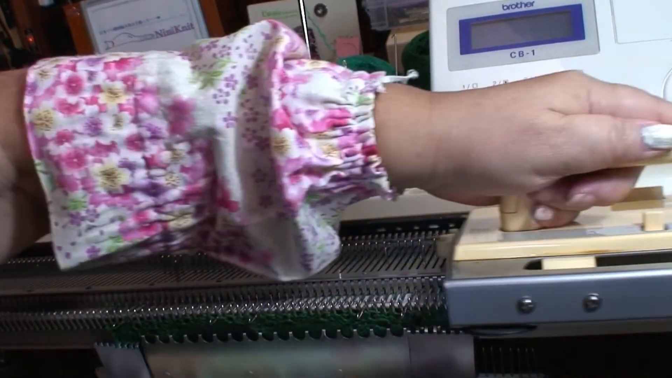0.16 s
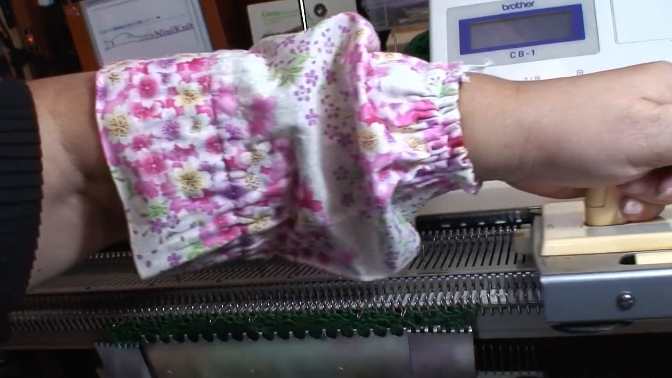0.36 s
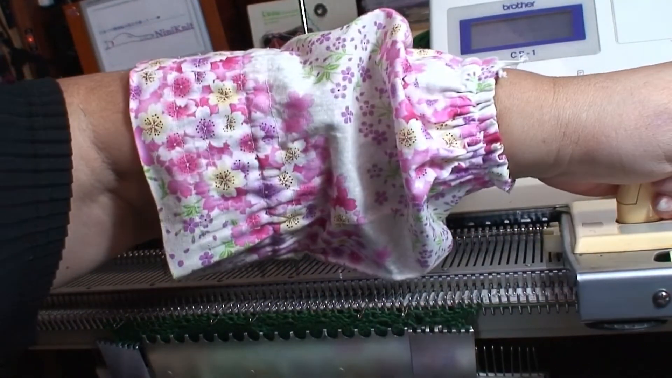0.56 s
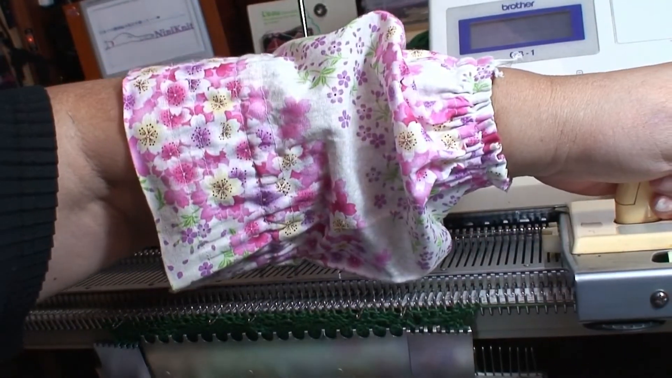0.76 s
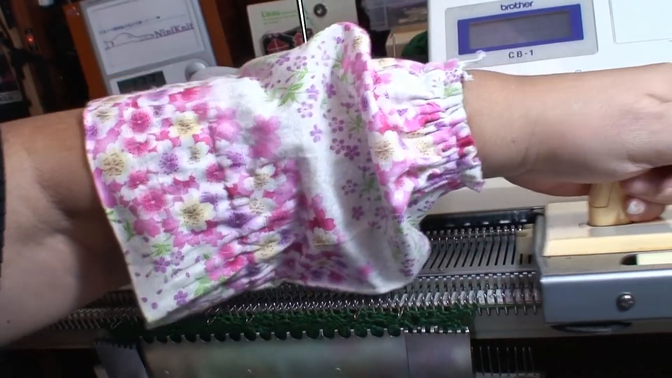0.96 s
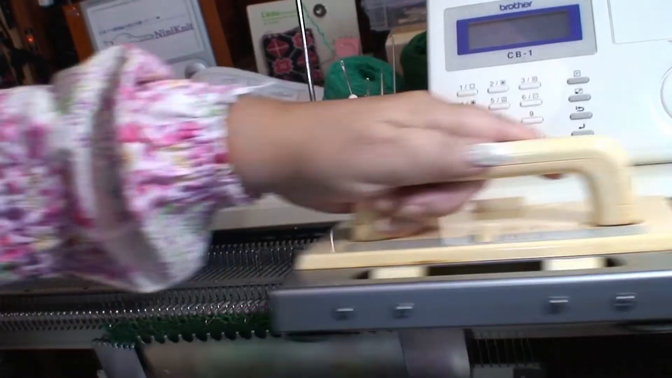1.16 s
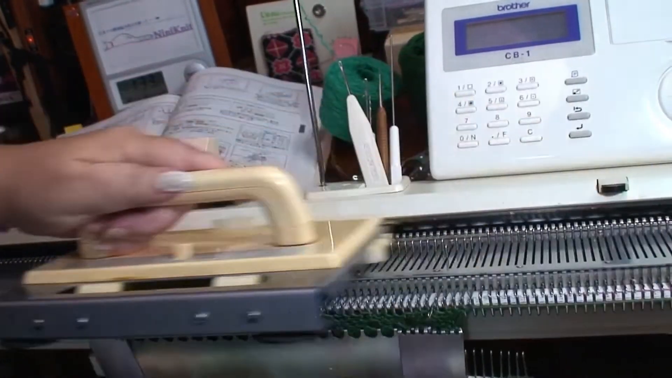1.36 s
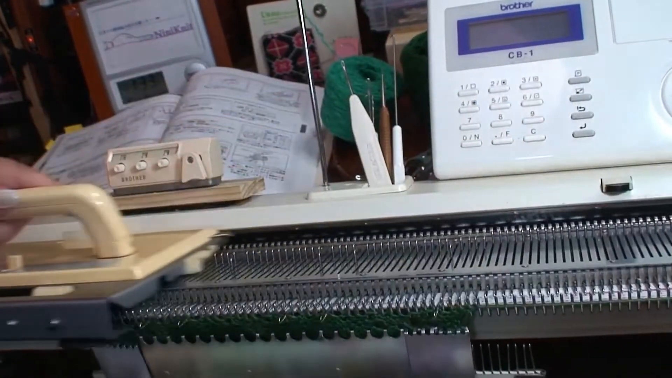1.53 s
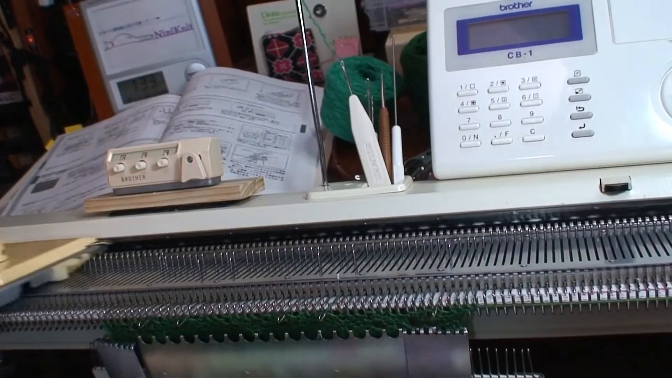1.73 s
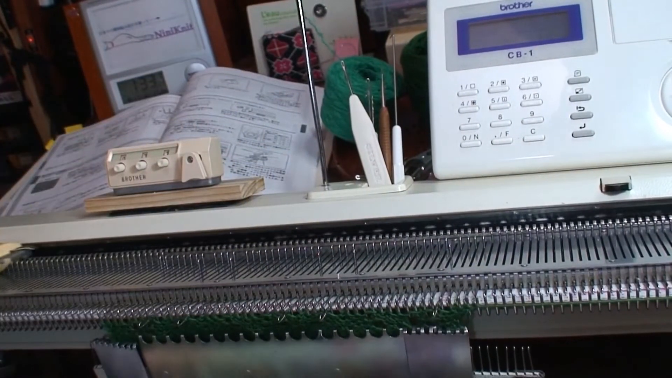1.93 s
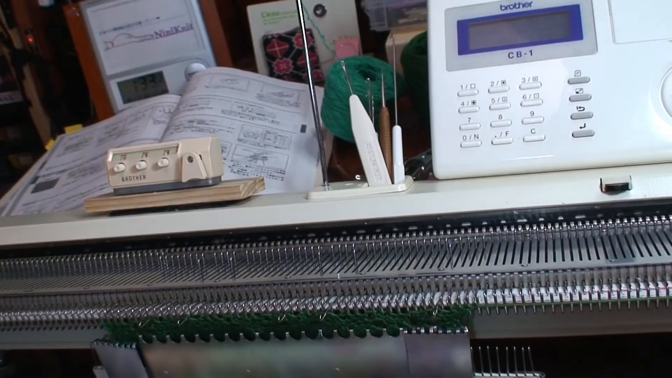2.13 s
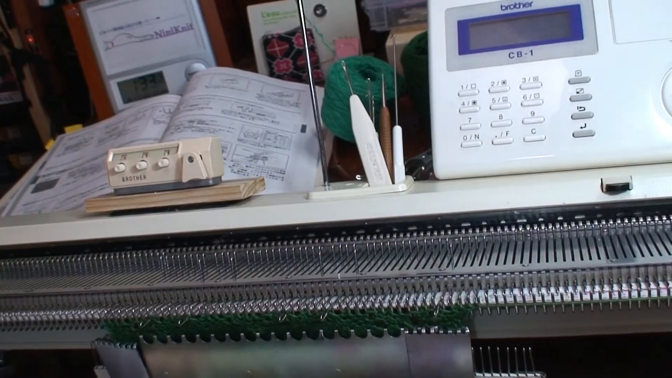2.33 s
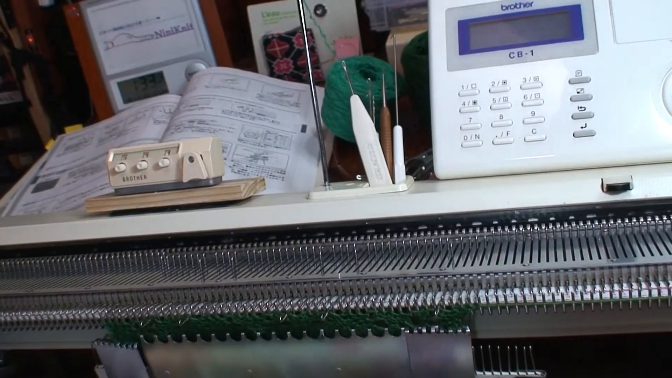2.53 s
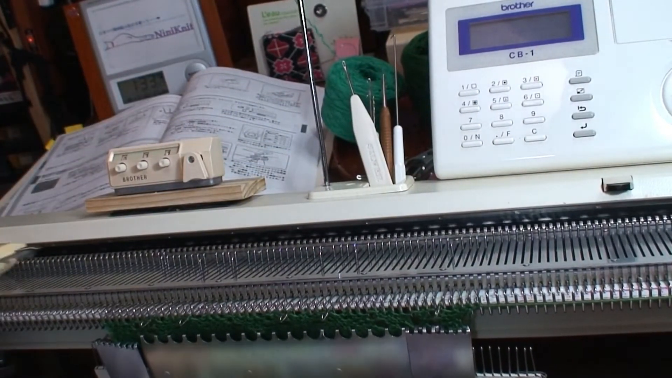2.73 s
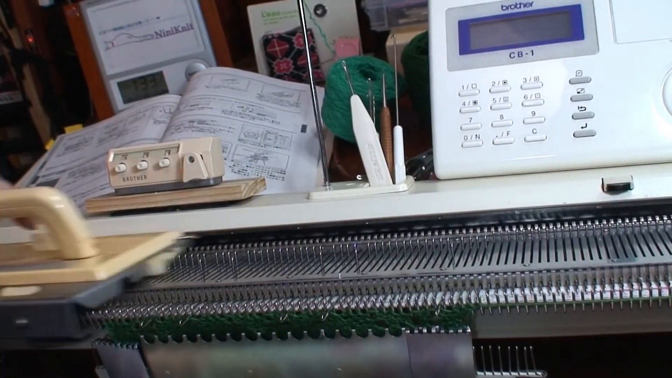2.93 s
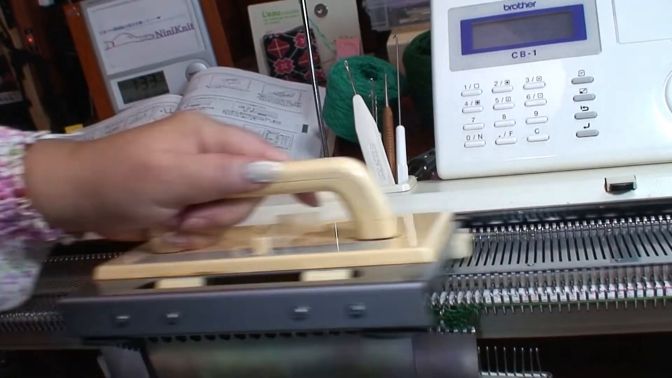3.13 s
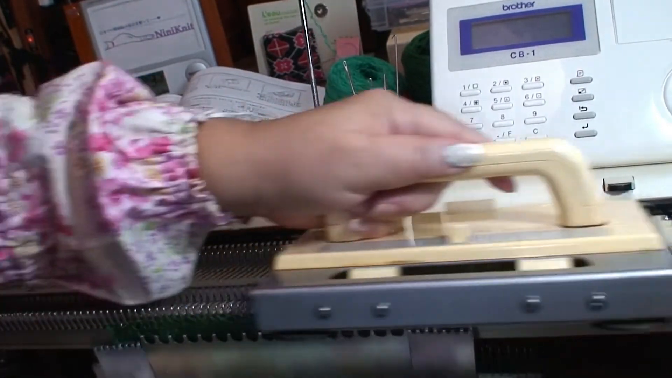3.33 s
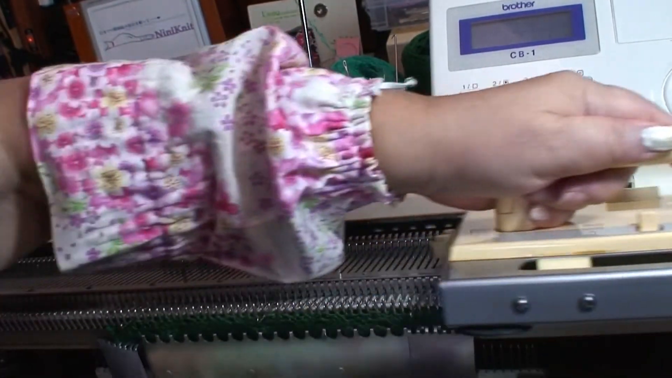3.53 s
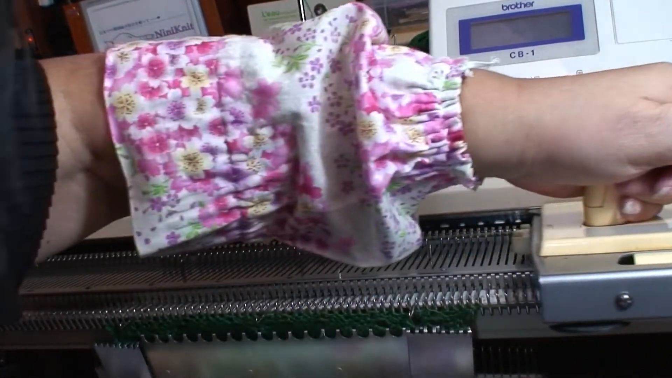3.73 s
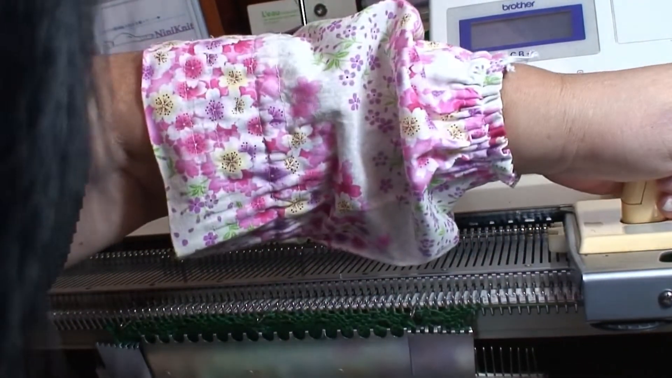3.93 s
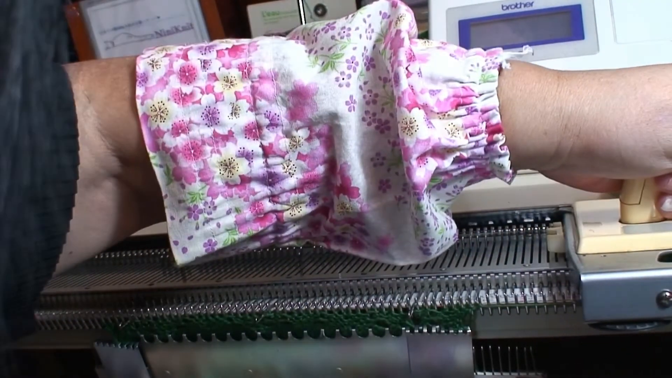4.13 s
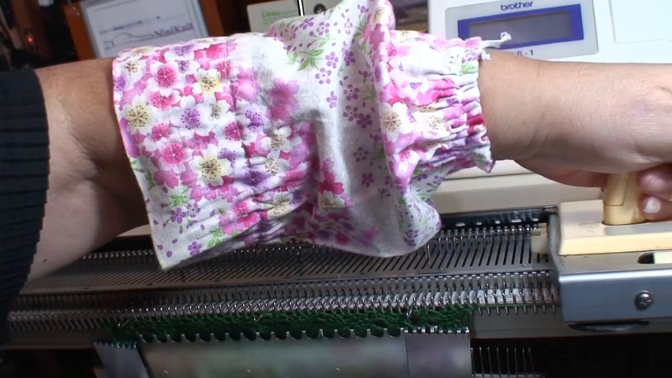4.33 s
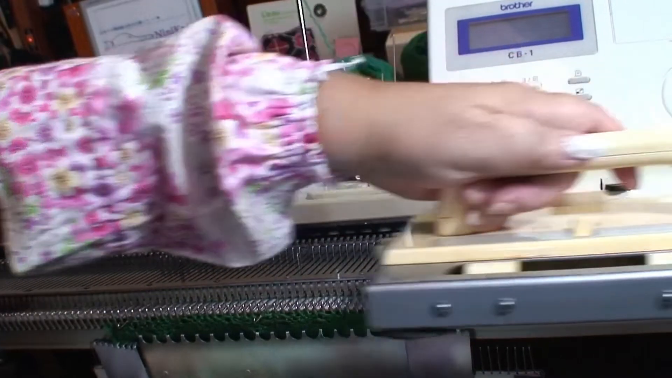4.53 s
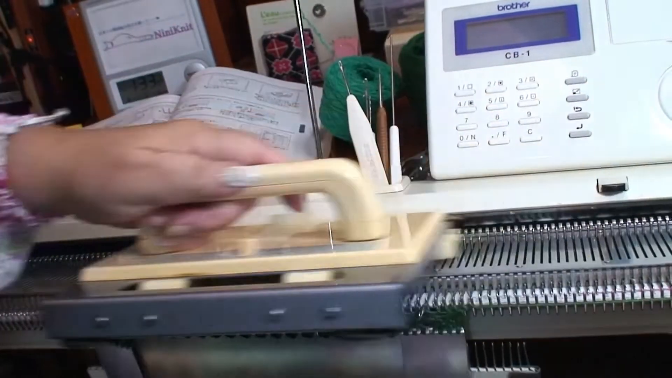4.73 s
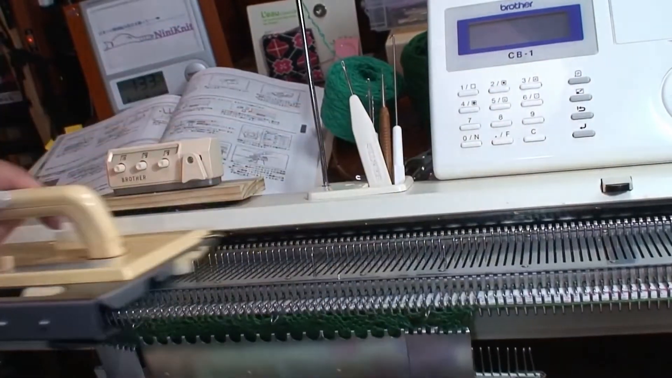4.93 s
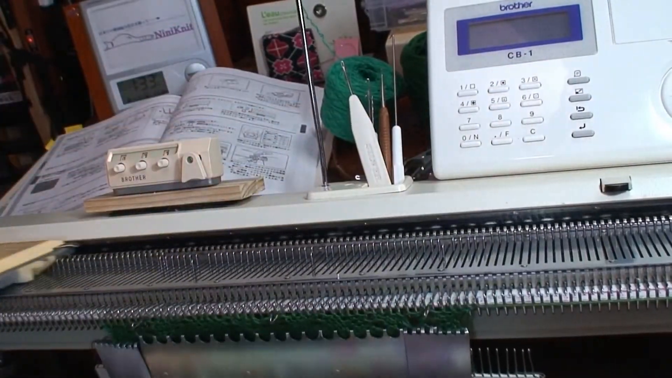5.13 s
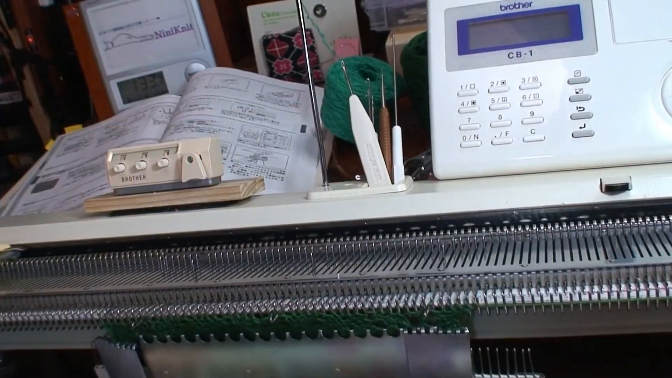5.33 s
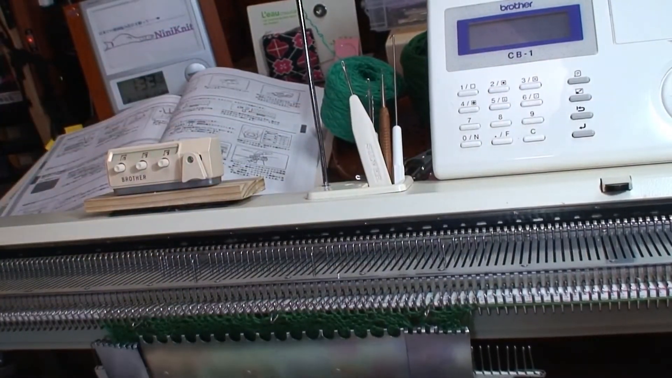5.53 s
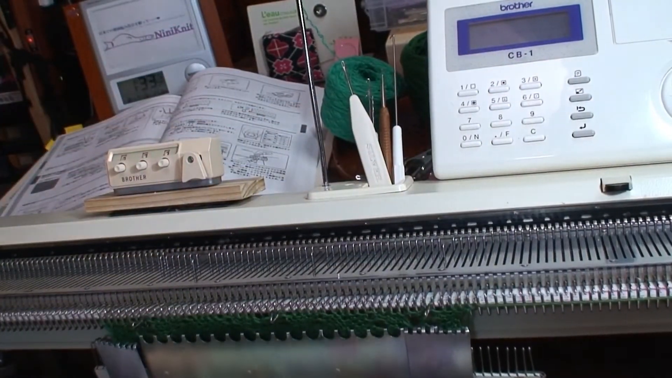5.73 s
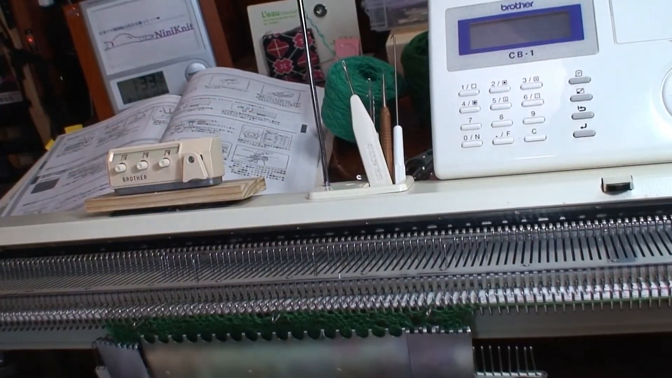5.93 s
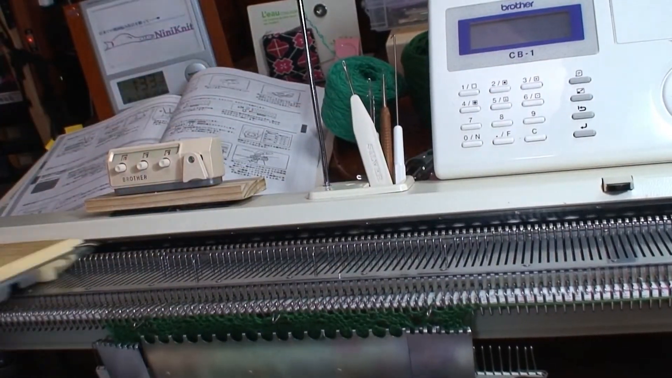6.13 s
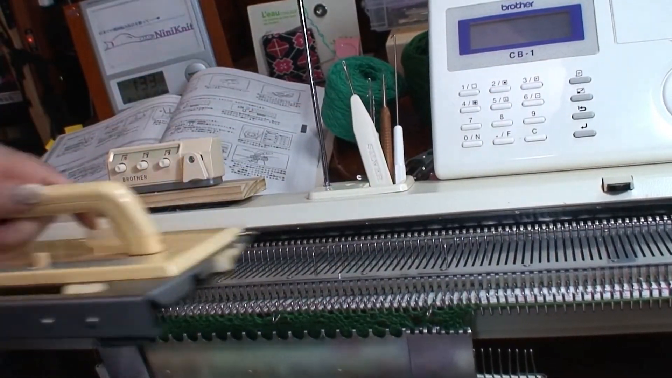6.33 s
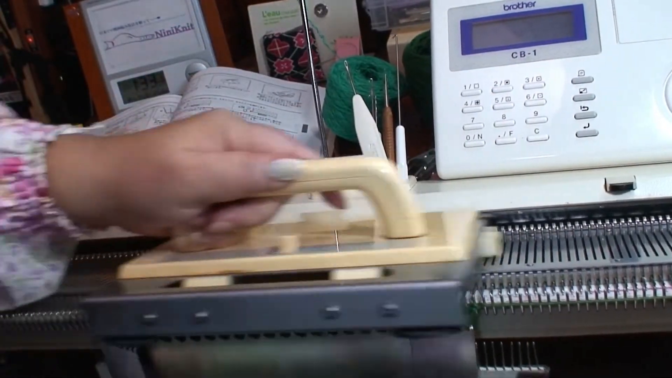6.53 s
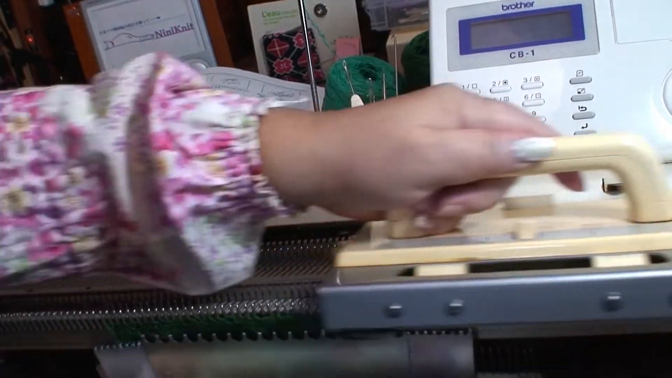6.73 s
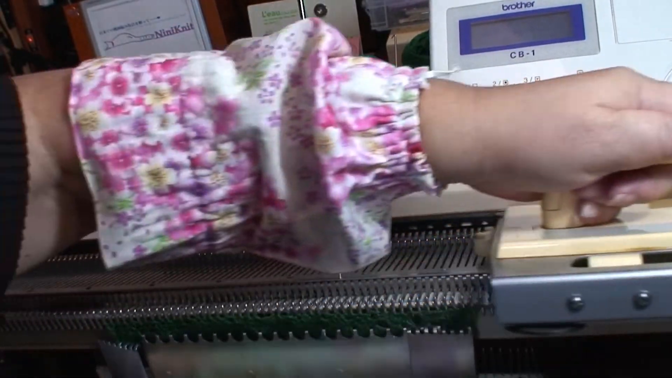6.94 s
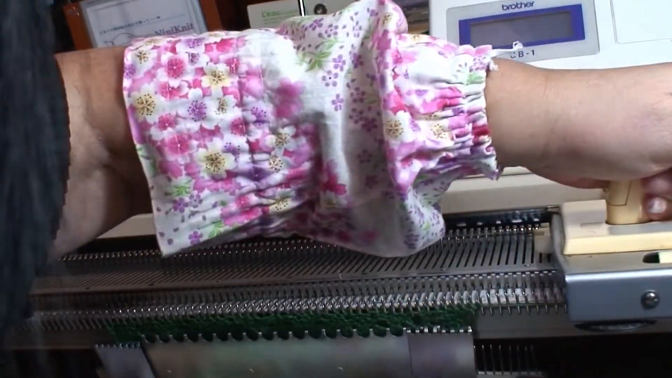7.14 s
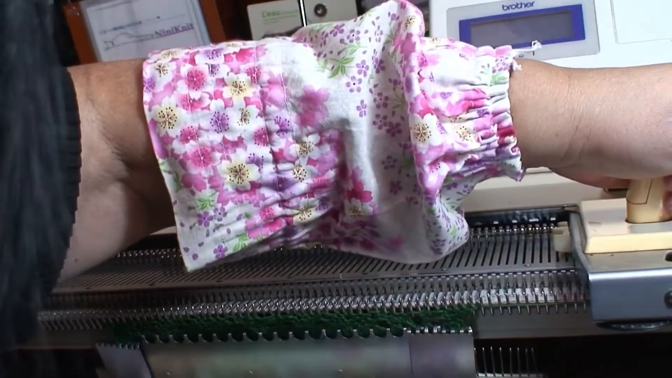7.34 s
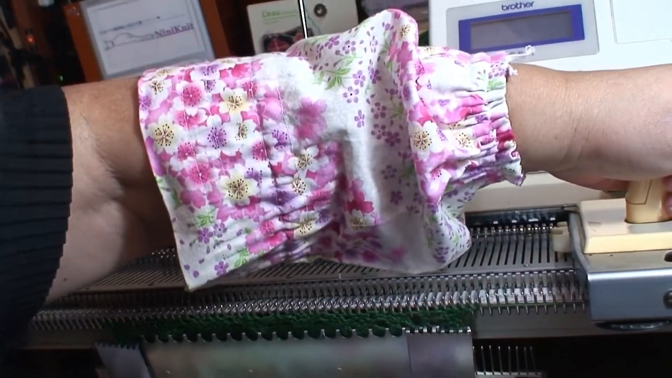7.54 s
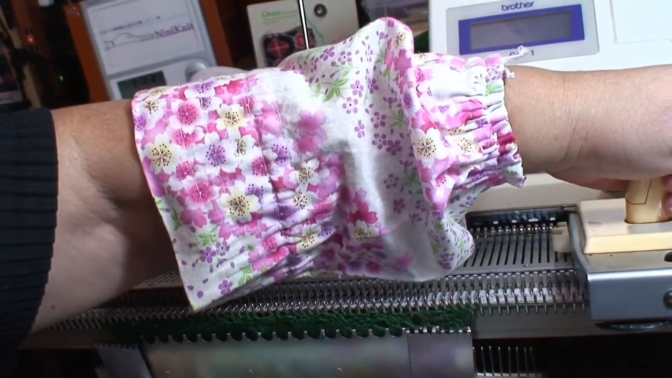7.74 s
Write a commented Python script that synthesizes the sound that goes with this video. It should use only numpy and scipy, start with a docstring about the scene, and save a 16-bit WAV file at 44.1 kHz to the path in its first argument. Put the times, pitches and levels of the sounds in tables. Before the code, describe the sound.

A hand-pushed carriage rakes rows of metal needles, giving fast zipper-like metallic bursts. The stretch opens just as one burst ends, followed by four separate passes, with runners scraping before and after and cams clacking and snapping. Between passes it quietens to soft low thuds, small ticks and a faint high metallic ringing. The sound is close, dry and bright, with little bass, a very short room tail and low steady air noise.

```python
"""A knitting machine carriage is pushed to and fro along its steel needle bed in a small room.
The end of one pass comes first: the runners scrape, cams clack and snap as filtered noise bursts; then four more.
In each it sets off with needle pings, rakes the working needles into a dense clatter of short rings, and coasts.
At the turns the loose carriage knocks on the bed in low bursts and a shaken spring sings in decaying sines;
resonators let the steel ring faintly, noise makes a short room tail and steady air."""
import sys
import numpy as np
from scipy import signal
from scipy.fft import rfft, irfft, next_fast_len
from scipy.io import wavfile
from scipy.ndimage import uniform_filter1d

SR = 44100
rng = np.random.default_rng(int(sys.argv[2]) if len(sys.argv) > 2 else 0)


def unload_audio(sound):
    """Save the sound as a 16-bit wav file, at the path given as the first command line argument."""
    columns = np.transpose(np.atleast_2d(sound))
    # keep every value between -1 and 1, then stretch to whole-number steps
    steps = np.round(np.clip(columns, -1, 1) * 32767)
    wavfile.write(sys.argv[1], SR, steps.astype(np.int16))


N = 347508
TIME = np.arange(N) / SR   # s

# colour of raked needles: hz, level_db
NEEDLE_COLOUR = [(530, -53.5), (900, -4.5), (1590, -10), (2220, -5), (2660, -3.5), (3230, -2.5), (4410, -4),
                 (7400, -2.5), (10000, -5), (11800, -6), (15200, -12.5), (16000, -28)]
# colour of the steel bed: hz, level_db
BED_COLOUR = [(100, -39.5), (170, -26), (230, -17), (285, -9.5), (330, -13), (400, -3.5), (520, 0),
              (610, 2), (690, 7), (780, 0), (880, -4.5), (1300, -5), (1700, -29.5), (2800, -73.5)]
# colour of runners and cams scraping: hz, level_db
SCRAPE_COLOUR = [(500, -16.5), (850, -3), (938, 1), (1060, 1.5), (1370, -1), (1500, 3.5), (1940, 5),
                 (2110, 4), (2500, 4.5), (3200, 4), (6370, -1.5), (7850, 0.5), (9670, -5), (11800, -3),
                 (16000, -16.5)]


def from_db(db):
    """Decibels to amplitude factor."""
    return 10 ** (np.asarray(db) / 20)


def rms_one(x):
    """Scale to rms 1."""
    return x / np.sqrt(np.mean(x ** 2) + 1e-20)


def gain_at(colour, hz):
    """A spectrum read on a log-frequency axis."""
    knots_hz, level_db = np.transpose(colour)
    return from_db(np.interp(np.log(hz + 1), np.log(knots_hz), level_db))


def noise(colour, size, peak_hz=1000, peak_db=-200, q=17.0):
    """Stereo noise of a given colour, with an optional resonance added; rms 1."""
    # stereo width: hz, side_minus_mid_db
    width = [(60, -10.5), (200, -11.5), (380, -9.5), (700, -10.5), (2400, -15), (4400, -11.5), (8100, -8),
             (10500, -2.5), (12000, -27.5)]
    hz = np.arange(size // 2 + 1) * SR / size
    resonance = from_db(peak_db) / (1 + (q * (hz - peak_hz) / peak_hz) ** 2)
    white = rfft(rng.standard_normal((2, size)))
    mid, side = white * (gain_at(colour, hz) + resonance)
    side = side * gain_at(width, hz)
    return rms_one(irfft([mid + side, mid - side], size))


def steady(colour):
    """Coloured noise that lasts the whole scene."""
    return noise(colour, next_fast_len(N, True))[:, :N]


def decay(t60_s, size):
    """Exponential decay, 60 dB in t60_s."""
    return from_db(-60 * TIME[:size] / t60_s)


def blow(colour, t60_s, peak_hz=1000, peak_db=-200, q=20.0, size=8192):
    """One contact: a crowd of close modes, as noise, starts at once and dies away."""
    return noise(colour, size, peak_hz, peak_db, q) * decay(t60_s, size)


def damped(hz, t60_s, size):
    """A struck mode: a decaying sine."""
    return np.sin(2 * np.pi * hz * TIME[:size]) * decay(t60_s, size)


def resonator(x, hz, t60_s):
    """One resonance driven by x, gain 1 on top."""
    r = from_db(-60 / (t60_s * SR))
    return signal.lfilter([1 - r, 0, r - 1], [1, -2 * r * np.cos(2 * np.pi * hz / SR), r * r], x + 1e-18)


def add(out, sound, start_s, peak_db):
    """Lay a sound in at a time and a peak level."""
    at = round(start_s * SR)
    out[:, at:at + sound.shape[1]] += from_db(peak_db) * sound[:, :N - at] / np.abs(sound).max()


def even(x, window_s):
    """Hold the slow level at 1 and keep the fast grain."""
    power = uniform_filter1d(np.mean(x ** 2, axis=0), int(window_s * SR))
    return x / np.sqrt(np.abs(power) + 1e-9)


def needle_ticks(travel, spread_db, slop_needles):
    """One cam meets needle after needle, each off its time and with its own force: samples, strengths."""
    needle = np.arange(int(travel[-1]) - 1)
    late, hard = rng.standard_normal((2, len(needle)))
    at = np.searchsorted(travel, needle + rng.random() + slop_needles * late)
    return np.minimum(at, N - 1), from_db(spread_db * np.clip(hard, -2, 2))


def played(sounds, at, force):
    """Every tick sets off one of the sounds, chosen by chance."""
    out = np.zeros((2, N))
    picks = rng.integers(0, len(sounds), len(at))
    for i, gain, k in zip(at, force, picks):
        out[:, i:i + sounds[k].shape[-1]] += gain * sounds[k][..., :N - i]
    return out


def raked(travel, colour, t60_s, spread_db, slop_needles, cams):
    """Several cams tick at once; every tick rings one of 24 unlike spots of the steel."""
    spots = [blow(colour, t60_s, size=3072) for _ in range(24)]
    ticking = sum(played(spots, *needle_ticks(travel, spread_db, slop_needles)) for _ in range(cams))
    return even(ticking, window_s=.05)


def air():
    """Steady coloured noise of the room air."""
    # hz, level_db
    air_colour = [(25, -26), (60, -11.5), (85, -13.5), (115, -3.5), (170, -11.5), (270, -8), (350, -4.5),
                  (600, -8), (1400, -13.5), (3000, -21), (8000, -31.5), (12000, -33.5), (16000, -36)]
    return from_db(-58) * steady(air_colour)


def carriage():
    """Each push speeds up, crosses the working needles and coasts; speed and place set the layers' gains."""
    # pushes of the carriage: needles_met_s, run_up_s, crossing_s, run_out_s, top_speed_needles_per_s,
    # clatter_db, scrape_before_db, scrape_after_db, rumble_db, ping_db, hum_db
    strokes = [(-0.52, .3, 0.46, 0.7, 172, -14.5, -27, -28, -31, -20, -52),
               (1.024, .24, 0.43, .98, 206, -16.5, -30, -24.5, -28, -27.5, -48.5),
               (2.908, .48, 0.47, 0.56, 168.6, -17.3, -20.5, -31.5, -30, -32.5, -50),
               (4.461, .21, .42, .83, 214, -17, -27, -28, -29, -21, -42),
               (6.262, .58, .47, .50, 176, -17.5, -24, -36.5, -31, -29.5, -49)]
    entry_speed, exit_speed, fastest_at = .86, .82, .42   # shares of top speed; share of the crossing
    engage_s, sag_db_per_s, release_db_per_s = .016, 5.5, 133.5   # release adds as the last cam leaves
    scrape_power, rumble_power = 2.244, 1.435   # growth with speed
    hum_at, hum_width = .62, .34   # shares of the crossing
    speed, clatter, scrape, rumble, hum, ping = np.zeros((6, N))
    for (met_s, up_s, cross_s, out_s, top, clatter_db,
         before_db, after_db, rumble_db, ping_db, hum_db) in strokes:
        t = TIME - met_s
        knots_s = [-up_s, 0, fastest_at * cross_s, cross_s, cross_s + out_s]
        pace = np.interp(t, knots_s, [0, entry_speed, 1, exit_speed, 0])
        speed += top * pace
        fade_db = sag_db_per_s * np.maximum(t, 0) + release_db_per_s * np.clip(t - cross_s, 0, 1)
        clatter += np.clip(t / engage_s, 0, 1) * from_db(clatter_db - fade_db)
        scrape_db = np.interp(t, [0, cross_s], [before_db, after_db])
        scrape += pace ** scrape_power * from_db(scrape_db)
        rumble += pace ** rumble_power * from_db(rumble_db)
        off_centre = (t / cross_s - hum_at) / hum_width
        hum += from_db(hum_db) * np.exp(-np.minimum(off_centre ** 2, 20))
        ping += pace * (t < 0) * from_db(ping_db)
    travel = np.cumsum(speed) / SR
    return travel, clatter, scrape, rumble, hum, ping


def jingle(travel):
    """Now one needle rings out, now another; no two have quite the same pitch."""
    # resonances of needles and cams: hz, level_db, t60_s
    needle_modes = [(2235, -19, .02), (3267, -14, .03), (4940, -23, .03), (7530, -15.5, .025),
                    (11950, -18, .02)]
    out = 0
    for hz, level_db, t60_s in needle_modes:
        pitches_hz = hz * (1 + .06 * rng.standard_normal(40))
        rings = [damped(pitch_hz, t60_s, size=2048) for pitch_hz in pitches_hz]
        ringing = played(rings, *needle_ticks(travel, spread_db=5.0, slop_needles=.25))
        out = out + from_db(level_db) * even(ringing, window_s=1.0)
    return out


def needles(travel, clatter_gain, hum_gain):
    """The cams drive the working needles: bright clatter, the bed drumming below, a hum at the needle rate."""
    clatter = from_db(-0.5) * raked(travel, NEEDLE_COLOUR, t60_s=.035, spread_db=1.0, slop_needles=.25, cams=3)
    drumming = from_db(-18) * raked(travel, BED_COLOUR, t60_s=.15, spread_db=2.5, slop_needles=.2, cams=2)
    # the hand does not push quite evenly
    knots = np.arange(0, travel[-1] + 5, 5)
    wobble_needles = .08 * np.interp(travel, knots, rng.standard_normal(len(knots)))
    phase = 2 * np.pi * (travel + wobble_needles)
    hum = np.sin(phase) + from_db(-7) * np.sin(2 * phase)
    return clatter_gain * (clatter + jingle(travel) + drumming) + hum_gain * hum


def rail(travel, scrape_gain, rumble_gain):
    """The runners scrape over the rail and brush idle needles; the bed rumbles along."""
    brushing = raked(travel, SCRAPE_COLOUR, t60_s=.044, spread_db=4.5, slop_needles=.3, cams=3)
    scrape = from_db(-2) * brushing + from_db(-4) * steady(SCRAPE_COLOUR)
    rumble = from_db(-5) * steady(BED_COLOUR)
    return scrape_gain * scrape + rumble_gain * rumble


def rattle(ring_hz, ring_db):
    """A cam rides up on a needle butt and hits, its chatter dies away; the bed booms under it."""
    hits, chatter_s = 5, .009
    out = from_db(-13.5) * blow(BED_COLOUR, t60_s=.11)
    for k in range(hits):
        late = .6 * rng.random() if k > 0 else 0
        at = int(chatter_s * (k + late) / (hits - 1) * SR)
        force_db = -6 if k == 0 else -2.6 * (k + 1)
        hit = from_db(force_db) * blow(SCRAPE_COLOUR, .05, ring_hz, ring_db, q=13.0, size=2048)
        out[:, at:at + hit.shape[1]] += hit
    return out


def idle_needles(travel, ping_gain, scrape_gain):
    """Some needles ping as the carriage sets off; here and there one catches a cam and clacks faintly."""
    ping_share, stray_share = .7, .12   # chances per needle passed
    stray_db = -20.5   # where the scrape is strongest, at mean force
    out = np.zeros((2, N))
    at, force = needle_ticks(travel, spread_db=4.5, slop_needles=.25)
    pings = [blow(SCRAPE_COLOUR, t60_s=.13, peak_hz=5070, peak_db=16, q=45.0) for _ in range(6)]
    faint_clacks = [rattle(hz, ring_db=10) for hz in np.geomspace(1900, 8000, 8)]
    pressure = scrape_gain / scrape_gain.max()
    for i, hard, (chance, pick) in zip(at, force, rng.random((len(at), 2))):
        if chance < ping_share and ping_gain[i] > 0:
            peak_db = 20 * np.log10(hard * ping_gain[i]) - 4
            add(out, pings[int(pick * len(pings))], i / SR, peak_db)
        elif chance > 1 - stray_share:
            peak_db = stray_db + 20 * np.log10(hard * pressure[i] + 1e-9)
            add(out, faint_clacks[int(pick * len(faint_clacks))], i / SR, peak_db)
    return out


def clacks():
    """A cam clacks against a needle butt, ringing at its own pitch."""
    # start_s, peak_db, ring_hz, ring_db
    clack_rows = [(0.0084, -11.5, 3170, 9.5), (0.136, -16, 2580, 8), (0.2214, -15.5, 1940, 9.5),
                  (0.3248, -15.5, 2030, 6), (1.5351, -8, 8330, -2.5), (1.5731, -14, 3460, 0),
                  (1.614, -18, 5860, 7), (1.6581, -14.5, 7900, 1), (1.7152, -14.5, 8000, 7),
                  (1.7462, -14, 2830, 2), (1.8063, -15.5, 3751, 4), (1.8674, -25, 7600, 13),
                  (1.9457, -14.5, 2570, 6), (1.9714, -18.5, 5000, 1), (2.0133, -19, 3700, 5.5),
                  (2.0368, -18, 2770, 4), (2.0738, -23, 8100, 6.5), (2.1333, -29.5, 2770, 20.5),
                  (2.6475, -14.5, 7670, 2.5), (2.6764, -15, 3200, 3), (2.7228, -11.5, 7760, 2.5),
                  (2.7501, -16.5, 3130, 9), (2.8076, -7, 8060, 2), (2.8494, -11, 8260, 9.5),
                  (3.3837, -10.5, 3364, 7), (3.4282, -13.5, 2000, 14.5), (3.6152, -25, 1900, 19),
                  (3.6506, -23.5, 7700, 2), (3.7195, -17.5, 1960, 6), (4.433, -20.5, 2260, 11),
                  (4.9311, -11, 3294, 0), (4.973, -11, 7060, 7), (5.0809, -23, 1760, 6),
                  (5.1324, -17, 2505, 17), (5.185, -20, 7050, 5), (5.3388, -23.5, 1700, -1),
                  (5.464, -24.5, 4430, 4), (5.5024, -20.5, 2460, 13), (5.9883, -26, 2240, 7),
                  (6.0045, -18.5, 5150, 5), (6.7256, -11, 3170, -4)]
    out = np.zeros((2, N))
    for start_s, peak_db, ring_hz, ring_db in clack_rows:
        add(out, rattle(ring_hz, ring_db), start_s, peak_db)
    return out


def snaps():
    """A sprung cam snaps back: a very short bright burst over a weaker, longer one."""
    # start_s, level_db
    snap_rows = [(0.1495, -1.5), (0.761, -40), (1.8059, -7.5), (2.015, -13.5), (2.3232, -28), (3.5254, -1),
                 (3.7228, -16.5), (4.2131, -32), (5.1856, -12), (6.8496, -3), (7.1596, -31),
                 (7.6032, -37.5)]
    # hz, level_db
    snap_colour = [(1200, -46.5), (2300, -18.5), (3150, -1.5), (4300, -8), (5600, -11.5), (7600, -6),
                   (9000, -14.5), (11000, -5.5), (13000, -16.5), (16000, -20)]
    out = np.zeros((2, N))
    for start_s, level_db in snap_rows:
        snap = blow(snap_colour, t60_s=.011) + from_db(-13.5) * blow(snap_colour, t60_s=.13)
        add(out, snap, start_s, level_db - 2.5)
    return out


def tocks():
    """The plastic handle and cover tock: a dull burst with one soft resonance."""
    # start_s, level_db, ring_hz
    tock_rows = [(0.398, -28.5, 1220), (2.336, -34, 1131), (3.68, -28.5, 974), (3.822, -30, 1146),
                 (4.001, -35.5, 1060), (4.226, -40.5, 929), (5.989, -33, 1236), (6.934, -37, 1130),
                 (7.222, -34, 1119)]
    # hz, level_db
    tock_colour = [(200, -25), (700, -5), (1000, -6), (1450, -4.5), (1900, -13), (3500, -15), (6000, -37.5),
                   (14000, -42.5)]
    out = np.zeros((2, N))
    for start_s, level_db, ring_hz in tock_rows:
        add(out, blow(tock_colour, t60_s=.11, peak_hz=ring_hz, peak_db=3.5), start_s, level_db + 2.5)
    return out


def thuds():
    """The carriage rocks against the bed: a low boom with a little needle rattle."""
    # start_s, peak_db, boom_hz, boom_level_db
    thud_rows = [(.405, -24.5, 330, 8), (.418, -37.5, 192.4, 17), (.856, -27.5, 560, -13.5),
                 (2.044, -18, 398.7, -21), (2.338, -27, 560, -3), (3.826, -29.5, 377.7, 2),
                 (4.237, -30, 640, 1), (4.449, -22, 694.9, 3), (5.468, -23, 420, 3), (5.485, -30, 200, 3),
                 (5.502, -28, 490, 6), (5.811, -25.5, 533, -8.5), (7.230, -36, 415, 11)]
    # hz, level_db
    thud_colour = [(70, -27), (170, -17), (300, -22.5), (430, -4), (700, -0.5), (1000, -8.5), (1800, -19.5)]
    out = np.zeros((2, N))
    for start_s, peak_db, boom_hz, boom_level_db in thud_rows:
        boom = blow(thud_colour, .19, boom_hz, boom_level_db - 1.5, q=8.4)
        shaken = from_db(-14.5) * blow(NEEDLE_COLOUR, t60_s=.087)
        add(out, boom + shaken, start_s, peak_db)
    return out


def steel(x, clatter_gain):
    """The bed plate and rail sing on faintly, and answer less while the needles clatter."""
    # long rings: hz, level_db, t60_s
    steel_modes = [(424, -23, 0.53), (490, -22.5, 1), (566, -23, 0.6), (640, -22, 1), (990, -40.5, 0.76),
                   (2770, -26.5, 0.5), (3160, -25, 0.67), (4400, -24, .9), (8360, -22.5, .15)]
    free = x / (1 + 25 * clatter_gain)
    return sum(from_db(level_db + 26.5) * resonator(free, hz, t60_s) for hz, level_db, t60_s in steel_modes)


def spring():
    """A loose spring, shaken as the carriage stops or starts, rings on thin and high."""
    # start_s, peak_db
    twangs = [(2.08, -27.5), (2.322, -47), (3.835, -47.5), (5.465, -32), (5.544, -35), (5.81, -43),
              (5.852, -34.5), (6.9, -52)]
    # hz, level_db, t60_s
    spring_modes = [(4250, -22, 0.65), (8100, -2.5, 0.2), (8175, -7.5, .3), (8510, -17, 0.2),
                    (9100, -17, 0.35), (9200, -7.5, 0.18), (11800, -3.5, .16), (12270, -12, .16)]
    out = np.zeros((2, N))
    for start_s, peak_db in twangs:
        strengths = from_db(2.5 * rng.standard_normal((len(spring_modes), 2, 1)))   # per mode and channel
        twang = 0
        for strength, (hz, level_db, t60_s) in zip(strengths, spring_modes):
            twang = twang + strength * from_db(level_db) * damped(hz, t60_s, size=SR)
        add(out, twang, start_s, peak_db)
    return out


def room(x):
    """Close walls and clutter: a very short diffuse tail, a little dulled."""
    t60_s, wall_hz, delay_s = .098, 5000, .00078
    t = TIME[:SR // 2]
    tail = rng.standard_normal((2, len(t))) * decay(t60_s, len(t)) * (t > delay_s)
    tail = tail / np.sqrt(np.sum(tail[0] ** 2))
    dulled = signal.sosfilt(signal.butter(1, wall_hz, fs=SR, output="sos"), tail)
    return signal.oaconvolve(x, dulled, axes=1)[:, :N]


def scene():
    """The carriage's motion drives all layers; steel, spring, room and air join them."""
    travel, clatter, scrape, rumble, hum, ping = carriage()   # travel in needles, the rest gains
    machine = needles(travel, clatter, hum) + rail(travel, scrape, rumble)
    machine = machine + idle_needles(travel, ping, scrape)
    machine = machine + clacks() + snaps() + tocks() + thuds()
    # the machine is thinned below 120 Hz
    machine = signal.sosfilt(signal.butter(2, 120, "high", fs=SR, output="sos"), machine)
    machine = machine + steel(machine, clatter) + spring()
    return machine + from_db(-9.5) * room(machine) + air()


def record(dry):
    """The top is cut steeply above 16 kHz."""
    return signal.sosfilt(signal.ellip(12, .1, 80, 16000, fs=SR, output="sos"), dry)


dry = scene()
out = record(dry)
unload_audio(out)
```